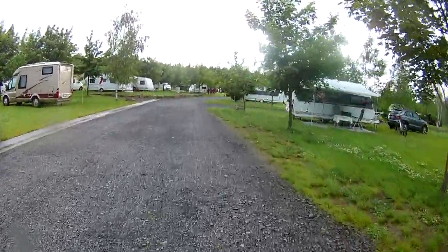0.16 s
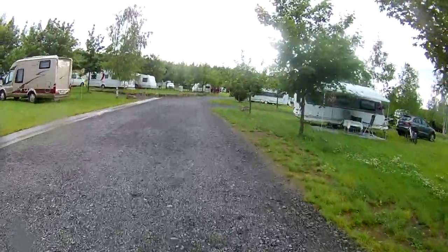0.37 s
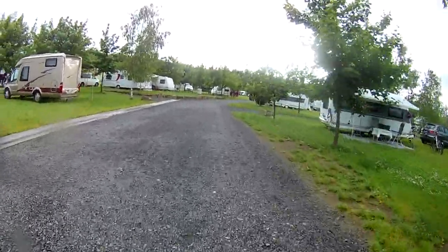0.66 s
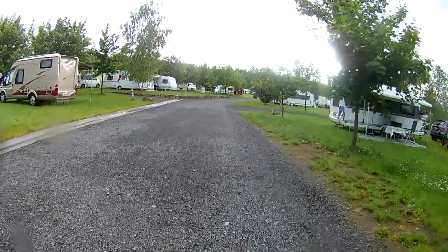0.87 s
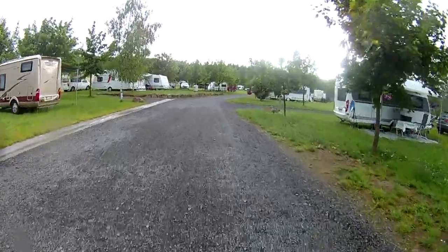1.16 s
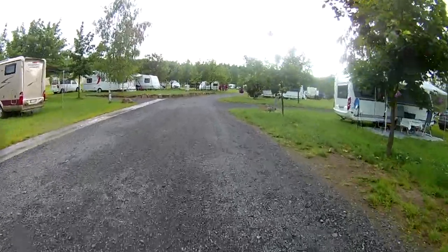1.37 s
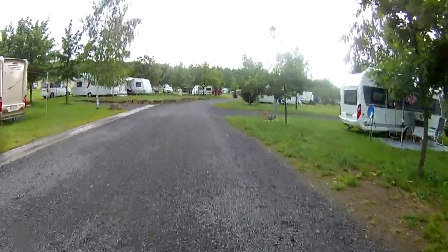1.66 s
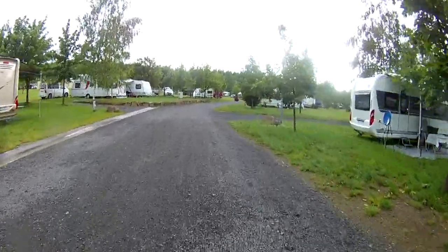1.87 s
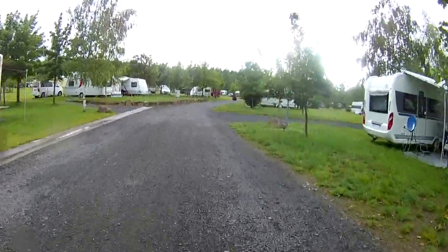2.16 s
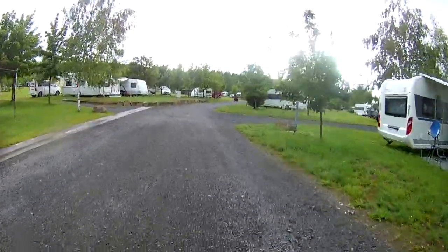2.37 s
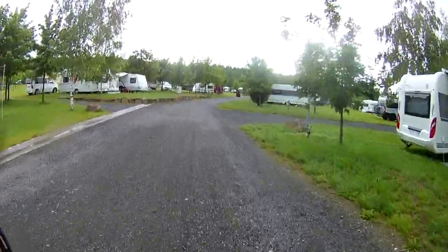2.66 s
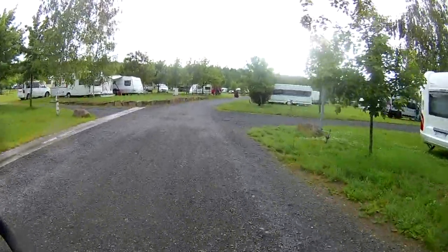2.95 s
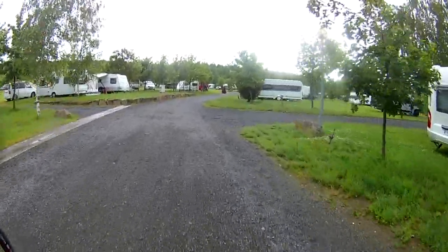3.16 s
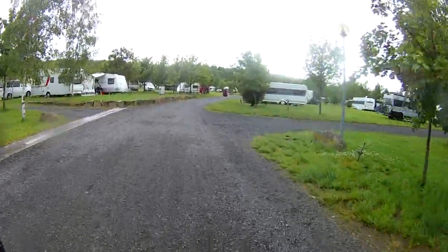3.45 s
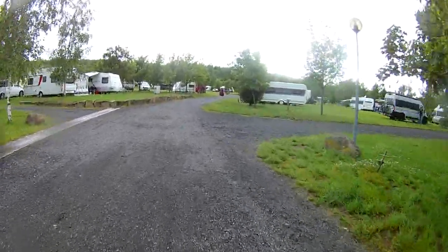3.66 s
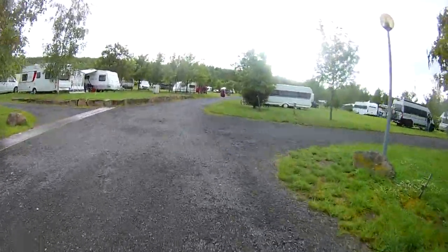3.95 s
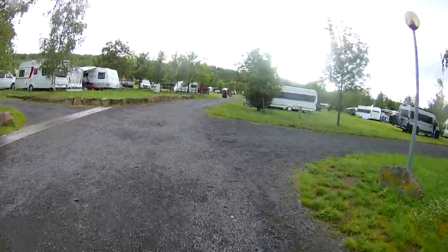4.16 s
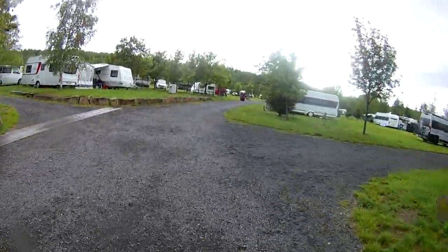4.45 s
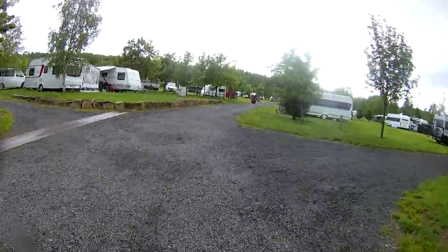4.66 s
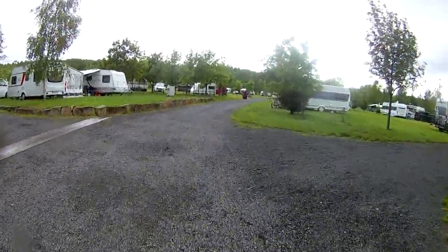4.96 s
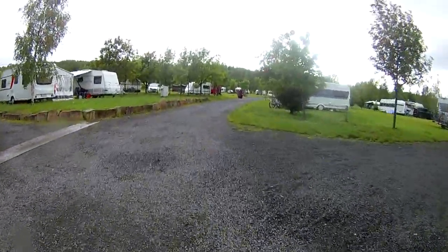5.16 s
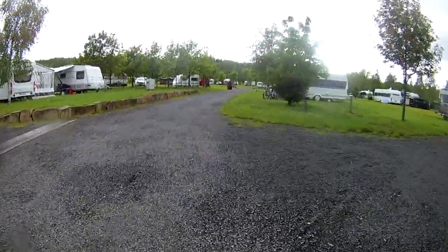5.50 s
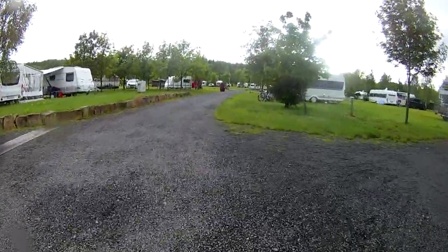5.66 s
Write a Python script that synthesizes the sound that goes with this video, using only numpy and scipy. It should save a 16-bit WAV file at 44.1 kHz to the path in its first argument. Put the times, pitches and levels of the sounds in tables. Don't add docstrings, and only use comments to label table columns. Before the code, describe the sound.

A bicycle rolls steadily along a gravel lane, heard very close from inside a closed case clamped to its frame. Throughout, the mount shudders about thirty times a second, a deep uneven flutter with low frame roar, above a quieter dull crunch of tyres coloured by hollow tube resonances. A stone pings the tubes at once, and from 0.1 s the loose case clatters: short bursts of two to five hard, dry plastic knocks, each with a thud, a bright crack and often a lighter tick just before. Bursts and single hits follow closely until about 2.8 s, densest around 2.2-2.7. One rattle comes near 3.2, then mostly shudder and crunch, with a stone ringing at 3.6. Scattered knocks return at 4.0-4.3, with another stone at about 4.17. After a lull, strong rattling resumes from 4.8 and continues nearly to the end at 5.8. Treble is muffled; there is no reverberation.

```python
import sys
import numpy as np
from scipy import signal
from scipy.fft import rfft, irfft, next_fast_len
from scipy.io import wavfile
from scipy.ndimage import map_coordinates

SR = 44100
rng = np.random.default_rng(int(sys.argv[2]) if len(sys.argv) > 2 else 0)


def gain_from_db(level_db):
    decades = np.asarray(level_db, float) / 20
    return 10 ** decades


def inscribe(sig):
    pcm = np.round(np.clip(np.atleast_2d(sig).T, -1, 1) * 32767)
    wavfile.write(sys.argv[1], SR, pcm.astype(np.int16))


N = 257103
RATTLE_HZ = 29

# t/s, depth/dB
NEAR_MISSES = [(0.051, -9.0), (0.198, -16.0), (0.292, -13.0), (0.341, -12.0), (0.662, -15.0),
               (0.757, -17.0), (0.796, -17.0), (0.975, -16.0), (1.024, -12.0), (1.358, -15.0),
               (1.428, -15.0), (1.54, -14.0), (1.751, -14.0), (2.141, -10.0), (2.318, -11.0),
               (2.936, -14.0), (3.024, -14.0), (3.094, -16.0), (3.147, -14.0), (3.27, -13.0),
               (3.916, -14.0), (3.955, -11.0), (4.018, -16.0), (4.149, -16.0), (4.353, -13.0),
               (4.755, -15.0), (4.783, -12.0), (4.839, -12.0), (5.101, -13.0), (5.519, -13.0)]


def unit(x):
    return x / np.sqrt(np.mean(x ** 2) + 1e-20)


def along(points, hz):
    f, v = np.transpose(points)
    return np.interp(np.log(hz + 1), np.log(f + 1), v)


def curves(rows):
    s, *cols = np.transpose(rows)
    return [np.interp(np.arange(N) / SR, s, c) for c in cols]


def wobble(rate):
    knots = rng.standard_normal(int(N * rate / SR) + 4)
    return map_coordinates(knots, [np.arange(N) * rate / SR])


def filtered(x, response):
    m = 2 * next_fast_len(N // 2 + SR // 4)
    return irfft(rfft(x, m) * response(np.fft.rfftfreq(m, 1 / SR)), m)[:N]


def knocks():
    # first knock/s, last knock/s, first level/dB, last level/dB, reach to the far stop/dB
    rattles = [(.0823, .1526, -4, -7.5, 0), (.231, .2619, -6, -10, 0), (.379, .452, -8, -7.5, 2),
               (.5373, .606, -10.5, -6, -2), (.8325, .8941, -5.5, -7.5, -4), (1.0552, 1.0875, -6, -5, 0),
               (1.1244, 1.1539, -4, -5.5, 3), (1.2466, 1.2781, -4, -9, -1), (1.4726, 1.5111, -6, -4, 0),
               (1.6105, 1.7125, -5, -8, 2), (2.083, 2.1132, -20, -13, 0), (2.174, 2.2071, -2.5, -8, -3),
               (2.2491, 2.2846, -11, -13.5, -3), (2.3479, 2.43, -8, -2.5, 1),
               (2.4624, 2.4944, -7.5, -6.5, -9), (2.5323, 2.6424, -6.5, -4.5, 1),
               (2.6775, 2.7415, -6.5, -14, -5), (2.7771, 2.8124, -14, -17, 0),
               (3.1816, 3.2157, -8, -21, -8), (4.2313, 4.2622, -5.5, -7, -7), (4.874, 4.9501, -3, -4, -1),
               (5.1345, 5.2018, -4, -10, 1), (5.3364, 5.367, -3.5, -5.5, 3), (5.46, 5.4898, -14, -11, 0)]
    # t/s, level/dB, reach to the far stop/dB
    singles = [(.9351, -6, 3), (1.2102, -14.5, 0), (1.3929, -8, 4), (1.5778, -8.5, -6), (1.7852, -8.5, -6),
               (1.8405, -7, -9), (1.873, -14, 0), (1.9771, -8.5, 4), (2.9072, -10, -3), (3.9902, -6, 5),
               (4.1129, -15.5, 0), (4.3154, -11, -3), (4.8144, -6, -9), (4.9798, -16.5, 0),
               (5.0488, -11.5, -5), (5.2418, -5.5, 3), (5.3011, -7.5, -8), (5.4306, -4, -3),
               (5.5525, -5.5, 0), (5.586, -28, 0), (5.6229, -7, -2), (5.7857, -11.5, 0)]
    arch_db_per_s = 30
    rows = list(singles)
    for first, last, first_db, last_db, reach_db in rattles:
        length = last - first
        u = np.linspace(0, 1, round(length * RATTLE_HZ) + 1)
        arch_db = arch_db_per_s * length * np.sin(np.pi * u)
        level_db = first_db + (last_db - first_db) * u + arch_db
        rows += zip(first + length * u, level_db, reach_db + 0 * u)
    return np.transpose(sorted(rows))


def effort():
    # t/s, level/dB, swing rate f/Hz
    sway = [(0, -24, 29), (.19, -26, 28), (.5, -26, 30), (.73, -24, 30.5), (1.3, -25, 31.5),
            (1.74, -25, 29), (2.01, -30, 32.5), (2.13, -23, 32.5), (2.3, -23, 29), (2.86, -21, 31),
            (3.3, -24, 30.5), (3.36, -32, 31.7), (3.5, -25, 31.6), (3.72, -33, 32), (3.85, -24, 33),
            (4.42, -24, 30), (4.6, -29, 30), (5.83, -25, 30.5)]
    spent_db = -14
    surge_late_s, surge_width_s = .008, .014
    calm_db, hz = curves(sway)
    s, db, reach_db = knocks()
    miss_s, miss_db = np.transpose(NEAR_MISSES)

    goes_on = np.diff(s, append=N) < 1.3 / RATTLE_HZ
    next_db = np.where(goes_on, np.maximum(np.roll(db + reach_db, -1), spent_db), spent_db)
    surge = np.zeros(N)
    surge[np.round(s * SR).astype(int)] = gain_from_db(2 * (-8.6 + .4 * db + .45 * next_db))
    surge[np.round(miss_s * SR).astype(int)] = gain_from_db(2 * (miss_db - 4))
    t = np.arange(-SR // 10, SR // 10) / SR
    bell = np.exp(-((t - surge_late_s) / surge_width_s) ** 2 / 2)
    surge = signal.fftconvolve(surge, bell, "same")
    calm = gain_from_db(2 * calm_db + 4.5 * wobble(9))
    return 10 * np.log10(calm + np.abs(surge)), hz


def mount():
    # f/Hz, level/dB
    frame_roar = [(15, -17.5), (40, -2), (62, 1), (90, -10), (170, -9.5), (300, -15), (520, -21.5),
                  (640, -73.5)]
    rebound_s = 0.0201
    level_db, hz = effort()
    turns = np.cumsum(hz) / SR

    contacts_s = np.r_[knocks()[0], np.transpose(NEAR_MISSES)[0]]
    contact = np.round(np.sort(contacts_s) * SR).astype(int)
    whole = np.cumsum(np.maximum(1, np.round(np.diff(turns[contact], prepend=0))))
    rebound = contact + round(rebound_s * SR)
    free = turns[np.ravel([contact, rebound], "F")]
    tied = np.ravel([whole, whole + 0.62], "F")
    turns += np.interp(turns, free, tied - free)

    angle = 2 * np.pi * (turns - .36)
    size = np.sqrt(2) * gain_from_db(level_db + 1.2 * wobble(24))
    second = (0.14 + 0.92 * size) * np.cos(2 * angle - .45)
    shape = np.cos(angle) + second - 0.063 * np.cos(3 * angle - .4)
    swing = -.45 * np.tanh(1.03 * size * shape / 0.48)
    roar = unit(filtered(rng.standard_normal(N), lambda f: gain_from_db(along(frame_roar, f))))
    roar_db = 0.66 * level_db - 18.3 + 2.5 * wobble(14) + 3.6 * np.cos(angle + 0.89)
    return swing + gain_from_db(roar_db) * roar


def resonances(modes):
    def response(f):
        total = 0
        for k, (centre, width, db) in enumerate(modes):
            damping = 1j * f * width
            total = total + (-1) ** k * gain_from_db(db) * damping / (centre * centre - f * f + damping)
        return total
    return response


def grit(rate, spread_db):
    yields = rng.random(N) < rate / SR
    clicks = yields * gain_from_db(spread_db * rng.standard_normal(N)) * rng.choice([-1, 1], N)
    return unit(0.71 * unit(clicks) + rng.standard_normal(N))


def tyres():
    # t/s, level/dB
    load = [(0.0, -38), (0.13, -41), (0.28, -40), (0.68, -41), (1.66, -38), (1.85, -41), (2.14, -41),
            (2.53, -36), (2.73, -40), (2.84, -41), (4.55, -40), (4.93, -37), (5.83, -38)]
    # f/Hz, width/Hz, level/dB
    tube_modes = [(759, 103, -7.5), (1003, 290, -7), (1555, 112, 0.5), (1875, 240, -3)]
    # f/Hz, width/Hz, level/dB
    rim_modes = [(370, 81, 3), (436.6, 89, 2.5)]
    # f/Hz, level/dB
    muffling = [(300, -17), (650, 7), (800, -5.5), (2250, -6), (2600, -23), (3100, -19.5), (3450, -10.5),
                (3650, -17.5), (4200, -17), (4700, -29), (7000, -47), (9000, -80)]
    crunch_db, = curves(load)
    mean_db = crunch_db.mean()
    drum_db = mean_db + 4 + .8 * (crunch_db - mean_db) + .8 * wobble(5)

    def through_case(f):
        return (resonances(tube_modes)(f) + 0.041) * gain_from_db(along(muffling, f))

    def through_rims(f):
        return resonances(rim_modes)(f) / (1 + (f / 600) ** 4)

    crunch = unit(filtered(grit(900, spread_db=3.5), through_case))
    drum = unit(filtered(grit(300, spread_db=-0.5), through_rims))
    jolts = wobble(16)
    crunch_db = crunch_db + 1.1 + 1.1 * jolts + 1.3 * wobble(70)
    return gain_from_db(crunch_db) * crunch + gain_from_db(drum_db - 2.5 + 1.2 * jolts) * drum


def stones():
    # t/s, level/dB, ring f/Hz, t60/s
    flung = [(0.043, -26, 1750, 0.055), (0.043, -26, 1400, 0.042), (.176, -29, 1570, 0.085),
             (0.177, -33, 1000, .04), (.343, -34, 1530, .05), (1.538, -41, 3900, .012),
             (1.538, -30, 1900, .012), (4.165, -28, 650, .025), (2.933, -51, 3900, 0.013),
             (3.276, -60, 3000, 0.014), (3.637, -51, 3600, 0.017), (4.175, -44, 3600, 0.022),
             (2.323, -26.5, 1500, 0.071), (3.02, -44.5, 3120, 0.014), (3.572, -25.5, 1600, 0.16),
             (3.574, -50, 3120, 0.012), (3.571, -28, 930, 0.039), (3.63, -51, 3600, 0.011),
             (3.686, -55, 3760, 0.014), (3.858, -53, 3230, 0.033), (4.166, -37, 3430, 0.026),
             (4.165, -28, 1600, .04), (4.758, -50, 3540, 0.016)]
    out, t = np.zeros(N + SR), np.arange(SR // 5) / SR
    for s, db, hz, t60 in flung:
        band = signal.butter(2, [hz * .87, hz * 1.15], "band", fs=SR, output="sos")
        burst = rng.standard_normal(len(t)) * gain_from_db(-60 * t / t60)
        ring = signal.sosfilt(band, burst)
        out[round(s * SR):][:len(t)] += gain_from_db(db + 3) * ring / np.abs(ring).max()
    return out[:N]


def strike(times, blow_db, modes, attack, scatter_db, detune, bounce):
    out, t = np.zeros(N + SR), np.arange(SR // 10) / SR
    hz, db, t60 = np.transpose(modes)[:, :, None]
    onset = 1 - np.exp(-t / attack)
    luck = rng.standard_normal((len(times), 2, 2, len(modes) + 1, 1))
    for s, level, contacts in zip(times, blow_db, luck):
        for again, (size, pitch) in enumerate(contacts):
            decay = gain_from_db(db + (1 + again) * scatter_db * size[1:] - 60 * t / t60)
            ring = decay * np.sin(2 * np.pi * hz * (1 + detune * pitch[1:]) * t)
            start = s + again * bounce[0] * np.exp(.3 * pitch[0, 0])
            gain = gain_from_db(level + again * (bounce[1] + 2.9 * size[0, 0]))
            out[round(start * SR):][:len(t)] += gain * ring.sum(axis=0) * onset
    return out[:N]


def case():
    # f/Hz, level/dB, t60/s
    thud_modes = [(128.4, -12, 0.017), (432, 1.5, 0.012), (704, -8, 0.0065), (1240, -19.5, .008)]
    # f/Hz, level/dB, t60/s
    crack_modes = [(1930, 9, 0.011), (2846, 1, 0.0085), (3180, 0.5, 0.0069), (3985, 2, 0.0096),
                   (4570, -2, 0.0086), (5420, -0.5, 0.0045), (6200, -8.5, 0.0032), (7370, -21, 0.0068),
                   (8400, -36, .006), (12500, -32.5, .005)]
    # f/Hz, level/dB, t60/s
    tick_modes = [(247, 12, 0.011), (614, 14, 0.014), (890, 9, 0.008), (1950, 13, 0.0054),
                  (2950, 1.5, 0.0062), (3850, -7.5, 0.0069), (5230, -18, 0.0048), (6900, -17.5, .006),
                  (8600, -36, .006), (10600, -27.5, .005), (12200, -27.5, .005)]
    s, thud_db, reach_db = knocks()
    luck = rng.standard_normal((len(s), 3)).T

    crack_db = -23.6 + .72 * thud_db - .25 * reach_db + .6 * luck[0]
    steady = dict(scatter_db=1.1, detune=.02, bounce=(.002, -16))
    thud = strike(s - .0003, thud_db + 2.2, thud_modes, attack=0.00019, **steady)
    crack = strike(s - .0005, crack_db + 2.5, crack_modes, attack=0.00016, **steady)

    tick_db = -23.8 + 2.2 * thud_db + reach_db + .6 * luck[1]
    slower_s = np.diff(s, prepend=0) - 1 / RATTLE_HZ
    slower_s[slower_s > .01] = 0
    lead_s = .0116 + .00035 * (tick_db + 30) + .45 * slower_s + .0006 * luck[2]
    tick_s = s - np.clip(lead_s, .004, .015)
    tick_db = np.where(tick_db > -44, tick_db, -120)
    loose = dict(scatter_db=1.2, detune=.025, bounce=(.0011, -5))
    tick = strike(tick_s, tick_db + 3.0, tick_modes, attack=0.00017, **loose)
    return crack - thud + tick


def causal(spectrum):
    def response(f):
        cepstrum = irfft(np.log(gain_from_db(along(spectrum, f))))
        cepstrum[1:len(f) - 1] *= 2
        cepstrum[len(f):] = 0
        return np.exp(rfft(cepstrum))
    return response


def scene():
    return (mount() + case() + tyres() + stones())[None]


def top_cut(x):
    return signal.sosfilt(signal.butter(12, 16100, fs=SR, output="sos"), x)


def record(dry):
    # f/Hz, level/dB
    port_gain = [(6500, 0), (6900, -13), (7350, -4), (7950, -26.5), (8500, -3), (10300, -4.5),
                 (13000, -11.5), (16000, -37.5)]
    # f/Hz, level/dB
    hiss_colour = [(3000, -28.5), (6000, 1), (11000, -5), (15500, -1.5)]
    heard = filtered(dry[0], causal(port_gain))
    heard = heard / (1 + np.abs(heard / .95) ** 5) ** (1 / 5)
    hiss = unit(filtered(rng.standard_normal(N), lambda f: gain_from_db(along(hiss_colour, f)) * (f < 16000)))
    mix = (heard + gain_from_db(-81.5) * hiss)[None]
    return top_cut(mix)


dry = scene()
out = record(dry)
inscribe(out)
```